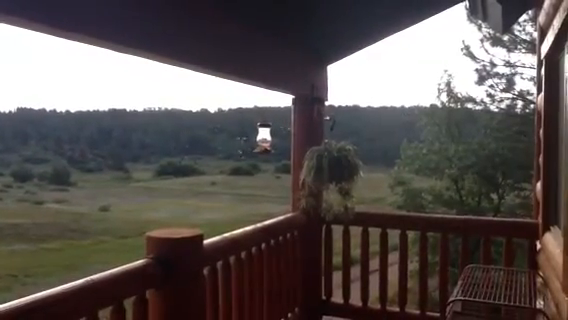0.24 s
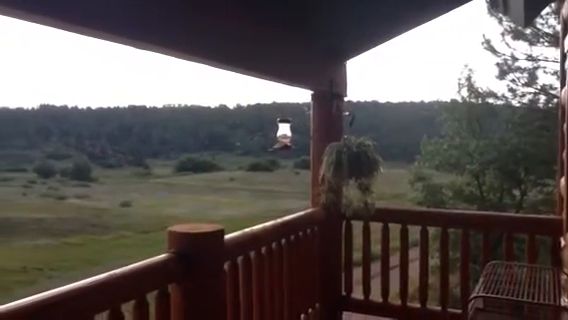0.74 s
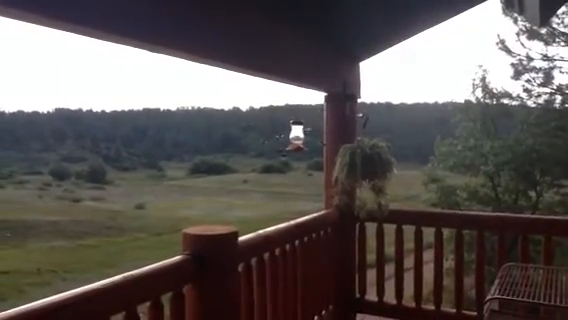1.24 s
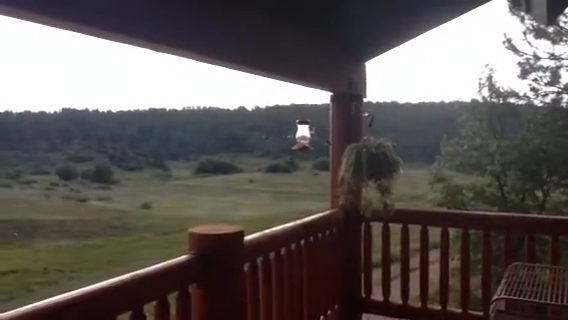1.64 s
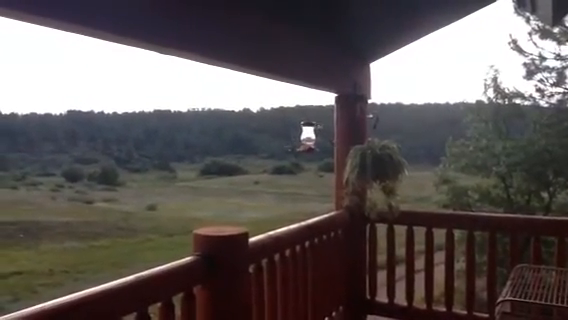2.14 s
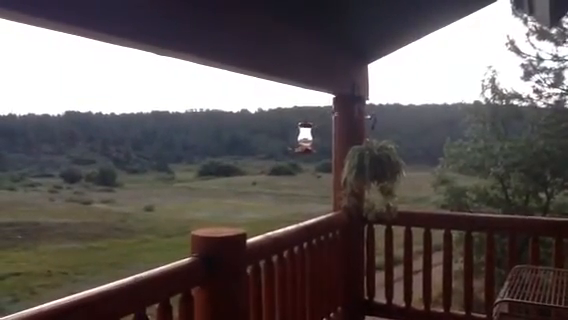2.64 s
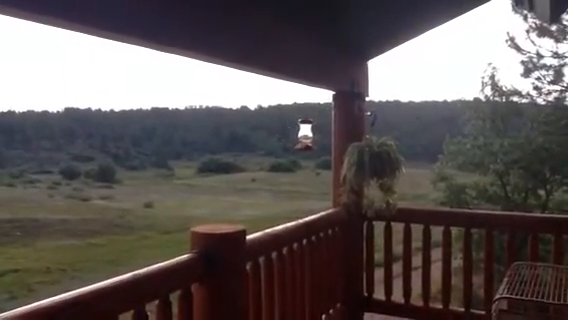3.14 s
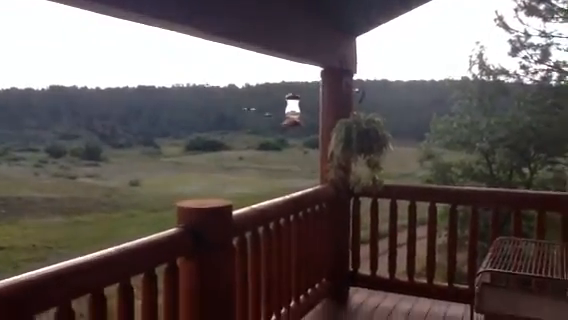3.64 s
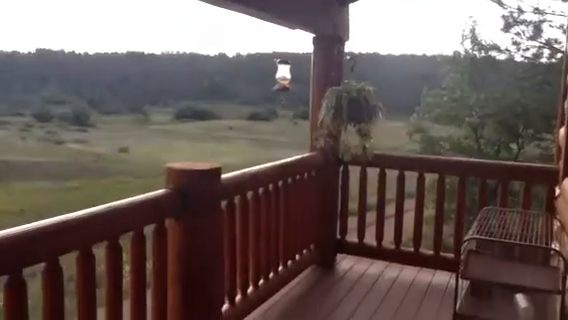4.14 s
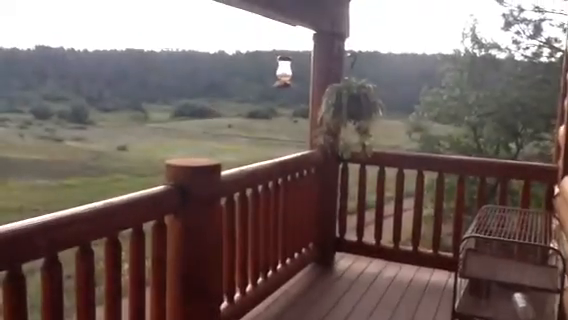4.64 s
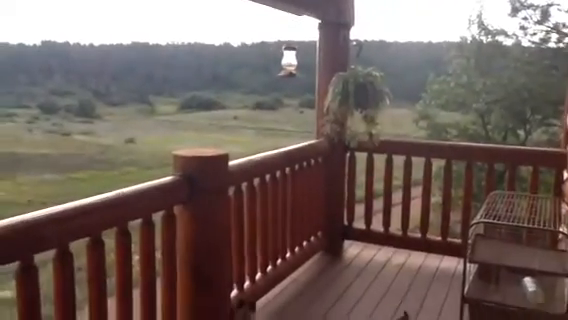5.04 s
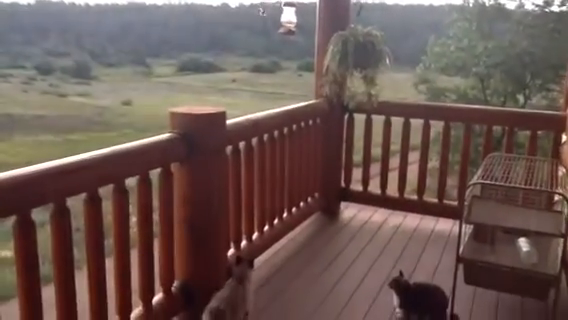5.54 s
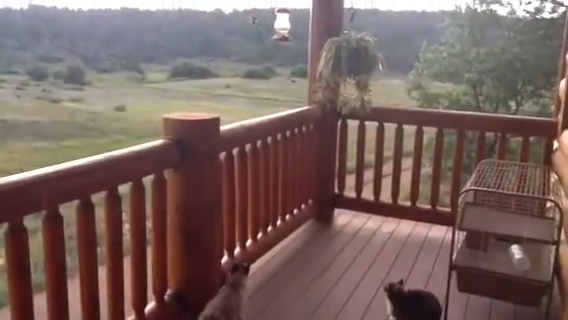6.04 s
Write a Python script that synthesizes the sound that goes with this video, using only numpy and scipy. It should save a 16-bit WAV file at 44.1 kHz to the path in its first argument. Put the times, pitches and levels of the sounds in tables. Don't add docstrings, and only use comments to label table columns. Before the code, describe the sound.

Hummingbirds squabble around a porch feeder with sharp falling chips, thin whistles and hoarse rasps, over faint wing trills, low hum and meadow hiss.

```python
import sys
import numpy as np
from scipy import signal
from scipy.fft import rfft, irfft
from scipy.io import wavfile

SR = 44100
rng = np.random.default_rng(int(sys.argv[2]) if len(sys.argv) > 2 else 0)


def store_pcm(level_fs):
    pcm = np.round(np.clip(level_fs, -1, 1) * 32767).astype(np.int16)
    wavfile.write(sys.argv[1], SR, np.atleast_2d(pcm).T)


def voltage_ratio(level):
    return 10 ** (np.asarray(level, float) / 20)


N = 276507

# (time [s], peak level [dB])
DULL_CHIPS = [(0.0014, -31.5), (0.0191, -34), (0.3515, -34), (0.4867, -33.5), (1.1707, -31),
              (1.7519, -34.5), (1.7978, -30.5), (1.9131, -35.5), (2.464, -32.5), (2.5328, -34),
              (2.9005, -30), (3.0043, -41), (3.0493, -41.5), (3.1007, -34), (4.0589, -50), (4.2153, -38),
              (4.572, -44.5), (4.7152, -48), (5.0652, -35), (5.1091, -44), (5.4026, -36), (5.6056, -44),
              (5.685, -51), (5.7563, -41.5), (5.9615, -34), (6.0832, -41.5), (6.1262, -39.5)]
# (time [s], peak level [dB])
BRIGHT_CHIPS = [(0.1944, -39), (0.5372, -39), (1.2371, -37), (1.9609, -31), (2.0667, -31), (2.6564, -33),
                (3.2522, -31.5), (3.501, -39.5), (3.6042, -31.5), (3.7822, -33.5), (3.8199, -34.5),
                (3.8505, -29.5), (3.9944, -37.5), (4.1948, -34), (4.2914, -42), (4.773, -34.5),
                (4.8657, -37)]
# (time [s], peak level [dB])
SLOW_CHIPS = [
    (0.5557, -27),
    (2.156, -30),
    (2.4079, -29.5),
    (4.4652, -35),
]
# (frequency [Hz], level [dB])
THROAT = [(1200, -5), (2200, -6), (4000, -7), (5500, -2), (7000, 3.5), (9000, 3), (12000, -3), (15500, -7),
          (17000, -53), (30000, -90)]
# (time of peak [s], hold [s], pitch [Hz], pitch after the hold [Hz], peak level [dB])
WHISTLES = [
    (0.302, .018, 6120, 5920, -26),
    (0.658, 0.0034, 4560, 4270, -33.5),
    (0.94, 0.0065, 4900, 4700, -32.5),
    (1.252, 0.0065, 4910, 4590, -32),
    (1.598, .003, 5270, 4830, -32.5),
    (1.665, 0.0033, 3695, 3390, -35.5),
    (4.129, 0.0017, 3670, 3510, -50.5),
]
# (time of peak [s], hold [s], pitch [Hz], pitch after the hold [Hz], peak level [dB])
SQUEAKS = [
    (3.677, 0.016, 5250, 6060, -32),
    (4.108, .025, 5395, 5360, -41),
]
# (time [s], length [s], pitch [Hz], level [dB])
RATTLES = [
    (.402, 0.021, 2314, -40),
    (0.719, 0.045, 2440, -39),
    (1.009, 0.055, 2458, -40),
    (1.335, .056, 2427, -38.5),
    (4.309, 0.021, 2293, -48.5),
]
# (time [s], climb [s], top pitch [Hz], level [dB], slide [s])
RASPS = [
    (.778, 0.038, 7260, -29, 0.036),
    (1.087, 0.035, 7720, -28.5, .049),
    (1.423, 0.041, 7720, -28.5, 0.052),
]
# (time [s], climb [s], top pitch [Hz], level [dB], fade [s])
SHORT_RASPS = [
    (.415, .06, 7200, -31.5, 0.025),
    (4.268, .014, 8800, -37.5, .011),
    (4.611, 0.03, 8000, -53.5, 0.023),
    (5.5, .02, 5800, -65, 0.011),
]
# (time [s], length [s], pitch [Hz], level [dB], pitch swing [share])
TREMBLES = [
    (0.056, 0.13, 8200, -29, 0.16),
    (3.26, 0.12, 7700, -37.5, 0.25),
    (6.151, 0.15, 7450, -45.5, 0.178),
]
# (time [s], length [s], level [dB])
MUTTERS = [
    (3.523, 0.024, -53),
    (3.858, .03, -48),
    (3.996, 0.0226, -50),
    (4.208, .025, -53),
    (4.962, 0.036, -47),
    (5.06, 0.025, -48),
    (5.544, 0.027, -49.5),
]
# (time [s], length [s], level [dB])
UNDERTONES = [
    (3.3, .085, -57),
    (3.41, .065, -56),
]
# (time [s], level [dB], pitch [Hz])
TRILL = [(0.0, -54, 9300), (0.19, -70, 8970), (0.44, -47, 9700), (0.7, -54, 9450), (1.68, -59, 10040),
         (2.01, -48, 10110), (3.02, -58, 9180), (3.25, -50, 9400), (3.58, -59, 9380), (3.67, -47, 9640),
         (4.0, -42, 9720), (4.36, -45.5, 9520), (4.62, -55, 9730), (4.79, -43, 10170), (5.05, -58, 9530),
         (5.27, -46, 10200), (5.95, -68, 9540), (6.15, -51, 10460)]
# (time of peak [s], rise [s], fade [s], level [dB])
LOW_TRILL = [
    (2.47, 0.0056, 0.1, -51.5),
    (3.178, .06, 0.16, -50.5),
    (3.35, 0.026, 0.021, -54),
    (3.523, .014, 0.075, -44.5),
    (4.962, 0.076, 0.028, -52.5),
    (5.15, 0.012, .02, -63),
    (5.714, .09, 0.046, -53.5),
    (5.872, 0.13, .03, -59.5),
]
# (time [s], level [dB])
HUM = [(0.0, -63), (0.1, -54.5), (0.26, -65), (0.31, -52.5), (0.44, -59), (2.32, -57), (2.46, -51.5),
       (2.58, -58), (4.02, -52.5), (4.07, -58.5), (4.54, -63.5), (5.64, -58.5), (6.18, -76), (6.27, -72)]
# (multiple of the beat, level [dB])
WING_ORDERS = [(2, -5), (3, -1.5), (4, -1.5), (5, -8.5), (7, -18.5), (8, -9.5)]
# (frequency [Hz], level [dB per Hz])
AIR = [(24, -62), (40, -71), (106, -7.5), (197, 4), (368, -8), (484, -8), (670, -13), (1080, -20.5),
       (3390, -17.5), (4800, -17), (8310, -16.5), (9650, -14.5), (11200, -15.5), (14400, -11), (15400, -9),
       (15800, -36)]


def rms_one(x):
    return x / np.sqrt(np.mean(x ** 2) + 1e-20)


def in_time(rows):
    s, *columns = np.transpose(rows)
    return [np.interp(np.arange(N) / SR, s, column) for column in columns]


def at_hz(points, hz):
    curve_hz, db = np.transpose(points)
    return np.interp(np.log(hz), np.log(curve_hz), db)


def drift(hz):
    r = np.exp(-2 * np.pi * hz / SR)
    noise = rng.standard_normal(N + SR)
    return rms_one(signal.lfilter([1], [1, -2 * r, r * r], noise)[SR:])


def add(out, s, sound):
    i = round(s * SR)
    out[i:i + len(sound)] += sound[:N - i]


def voice(pitch_hz, overtone_db):
    pitch_hz = np.maximum(pitch_hz, 600)
    phase = 2 * np.pi * np.cumsum(pitch_hz) / SR
    tone = 0
    for k in range(1, 8):
        level_db = at_hz(THROAT, k * pitch_hz) + (k - 1) * overtone_db
        tone = tone + voltage_ratio(level_db) * np.sin(k * phase)
    return tone


def chips():
    out, waver, catch = np.zeros(N + SR), drift(1400), drift(420)
    top_hz = 8600
    # (events, fall [ms], overtones [dB each], end pitch [Hz], length [falls], fade [per fall])
    kinds = [(DULL_CHIPS, 6.7, -4.5, 1700, 4, 0.21),
             (BRIGHT_CHIPS, 6.0, 1.5, 1695, 3.8, 0.35),
             (SLOW_CHIPS, 9.0, -1, 1719, 5, 0.2847)]
    for rows, fall_ms, overtone_db, end_hz, falls, fade in kinds:
        t = np.arange(round(falls * fall_ms * SR / 1000)) / SR
        falls_past = 1000 * t / fall_ms
        fall_hz = end_hz + (top_hz - end_hz) * np.exp(-falls_past)
        breath = (1 - np.exp(-t / 0.0016)) * np.exp(-fade * falls_past) * (1 - t / t[-1]) ** 0.74
        for s, db in rows:
            at = round(s * SR) + np.arange(len(t))
            pitch_hz = fall_hz * (1 + 0.014 * waver[at] * np.exp(-t / 0.022))
            level = voltage_ratio(db - 3.5 + 3.74 * catch[at])
            add(out, max(s - 0.0025, 0), level * breath * voice(pitch_hz, overtone_db))
    return out[:N]


def whistles():
    whistle, squeak = (287, 0.0093, 0.21, 0.0067, 0.48), (160, 0.041, 0.58, 0.035, 2.6)
    swell_s, drop_s, end_hz, end_db = 0.0073, 0.021, 1884, -10.5
    for kind, rows in [(whistle, WHISTLES), (squeak, SQUEAKS)]:
        for s, hold, hz, after, db in rows:
            release = s + hold
            held_db = db - 400 * hold
            knee_hz = end_hz + 0.37 * (after - end_hz)
            yield (kind, (s - swell_s, hz, db - 20), (s, hz, db), (release, after, held_db),
                   (release + drop_s / 2, knee_hz, held_db + end_db / 2),
                   (release + drop_s, end_hz, held_db + end_db))


def rattles():
    kind = (105, 0.08, 0.95, 0.075, 1.6)
    for s, length, hz, db in RATTLES:
        yield (kind, (s, hz, db - 19), (s + 0.0043, hz, db), (s + 0.52 * length, hz, db - 0.5),
               (s + length, 0.7 * hz, db - 11))


def rasps():
    kind = (599, 0.1766, 0.3, 0.1045, -2.4)
    knee_s, knee_hz, foot_hz_per_s = 0.016, 2730, -30000
    for s, climb, hz, db, slide in RASPS:
        top_s = s + climb
        foot_hz = knee_hz + foot_hz_per_s * (slide - knee_s)
        yield (kind, (s, 0.74 * hz, db - 5.5), (top_s, hz, db), (top_s + knee_s, knee_hz, db - 12.5),
               (top_s + slide, foot_hz, db - 14.5))
    for s, climb, hz, db, fade in SHORT_RASPS:
        yield (kind, (s, 0.74 * hz, db - 5.5), (s + climb, hz, db),
               (s + climb + fade, 0.67 * hz, db - 20))


def trembles():
    for s, length, hz, db, swing in TREMBLES:
        overtone_db = 3.5 + 68 * (swing - 0.2)
        yield ((103, swing, 0.12, 0.011, overtone_db), (s, 1.08 * hz, db - 7.5),
               (s + 0.15 * length, hz, db), (s + 0.425 * length, hz, db),
               (s + length, 0.98 * hz, db - 3))


def mutters():
    mutter, undertone = (114, 0.1, 0.2, 0.007, -6), (59, 0.01, 0.6, 0.012, -25)
    for s, length, db in MUTTERS:
        yield mutter, (s, 2000, db), (s + length, 1490, db - 14)
    for s, length, db in UNDERTONES:
        yield undertone, (s, 2000, db), (s + length, 2000, db - 6)


def notes():
    out, waver, uneven = np.zeros(N + SR), drift(1150), drift(62.4)
    phrases = [*whistles(), *rattles(), *rasps(), *trembles(), *mutters()]
    for (rate_hz, swing, throb, hoarse, overtone_db), *path in phrases:
        s, hz, db = np.transpose(path)
        at = np.arange(round(s[0] * SR), min(round(s[-1] * SR), N))
        centre_hz = np.exp(np.interp(at / SR, s, np.log(hz)))
        height = centre_hz / hz.max()
        tremble = 2 * np.pi * np.cumsum(rate_hz * (1 + 0.0657 * uneven[at])) / SR
        shake = swing * height ** 1.64 * np.sin(tremble)
        roughness = hoarse * height ** 1.43 * np.clip(waver[at], -2.5, 2.5)
        pitch_hz = centre_hz * (1 + shake + roughness)
        throbbing = 1 - throb * (1 + np.sin(tremble + 2.5)) / 2
        strength = voltage_ratio(np.interp(at / SR, s, db)) * throbbing
        edges = signal.windows.tukey(len(at), 0.08)
        add(out, s[0], 1.377 * strength * edges * voice(pitch_hz, overtone_db))
    return out[:N]


def feather(pitch_hz, beats_hz, spread, depth_db):
    stroke = 2 * np.pi * np.cumsum(beats_hz * (1 + 0.01937 * drift(15.75))) / SR
    burst_db = depth_db * (np.cos(stroke) + 0.5 * np.cos(2 * stroke)) + 2.6 * drift(120)
    flutter_hz = pitch_hz * (1 + spread * np.tanh(drift(702)) + 0.027 * np.sin(stroke))
    tone = np.sin(2 * np.pi * np.cumsum(flutter_hz) / SR)
    return rms_one(voltage_ratio(burst_db) * tone), stroke


def low_passes():
    level = 0
    for s, rise, fade, db in LOW_TRILL:
        edge_db = db - 12
        path = [(s - rise - 0.015, -100), (s - rise, edge_db), (s, db),
                (s + fade, edge_db), (s + fade + 0.015, -100)]
        level = level + voltage_ratio(in_time(path)[0])
    return level


def wing_hum(stroke, other):
    hum = 0
    for k, db in WING_ORDERS:
        for turn in (stroke, 0.88 * other):
            hum = hum + voltage_ratio(db + 4.94 * drift(18.4)) * np.sin(k * turn)
    return rms_one(hum)


def wings():
    trill_db, pitch_hz = in_time(TRILL)
    beats_hz = 62 + 0.54 * (trill_db - trill_db.mean()) + 3 * drift(2.53)
    high, stroke = feather(pitch_hz, beats_hz, spread=0.058, depth_db=6.5)
    low, other = feather(4455 * (1 + 0.014 * drift(8.0)), 66, spread=0.07, depth_db=5.5)
    trills = voltage_ratio(trill_db) * high + voltage_ratio(0.5) * low_passes() * low
    hum_db, = in_time(HUM)
    rush_db = -70.5 + hum_db - hum_db.mean()
    rush_band = signal.butter(2, [350, 1900], "band", fs=SR, output="sos")
    rush = rms_one(signal.sosfilt(rush_band, rng.standard_normal(N)))
    hum = voltage_ratio(hum_db - 3.5) * wing_hum(stroke, other)
    return trills, hum + voltage_ratio(rush_db - 4.5) * rush


def porch(x, direct_db):
    t = np.arange(SR // 2) / SR
    porch_t60_s, trees_t60_s, trees_db = 0.14, 0.26, -12
    near = rng.standard_normal(len(t)) * voltage_ratio(-60 * t / porch_t60_s) * (1 - np.exp(-(t / 0.0003) ** 2))
    far = rng.standard_normal(len(t)) * voltage_ratio(-60 * t / trees_t60_s) * (1 - np.exp(-t / 0.05))
    echoes = near / np.linalg.norm(near) + voltage_ratio(trees_db) * far / np.linalg.norm(far)
    echoes = signal.sosfilt(signal.butter(1, 2500, "high", fs=SR, output="sos"), echoes)
    return voltage_ratio(direct_db) * x + signal.fftconvolve(x, echoes)[:N]


def air():
    hz = np.maximum(np.fft.rfftfreq(N, 1 / SR), 1)
    colour = voltage_ratio(at_hz(AIR, hz))
    midband = (hz > 600) & (hz < 8000)
    inside = np.sqrt(np.sum(colour[midband] ** 2) / len(hz))
    hiss = irfft(rfft(rng.standard_normal(N)) * colour / inside, N)
    return voltage_ratio(-64 + 1.26 * drift(5.5)) * hiss


def scene():
    trills, hum = wings()
    smeared = porch(chips() + notes() + voltage_ratio(-6.0) * trills, direct_db=-3.0)
    return (smeared + voltage_ratio(-7.5) * trills + hum + air())[None]


def low_pass(x):
    return signal.sosfilt(signal.butter(12, 16240, fs=SR, output="sos"), x)


def record(dry):
    top_cut = signal.cheby2(12, 50, 16300, fs=SR, output="sos")
    mix = signal.sosfilt(top_cut, dry)
    return low_pass(mix)


dry = scene()
out = record(dry)
store_pcm(out)
```